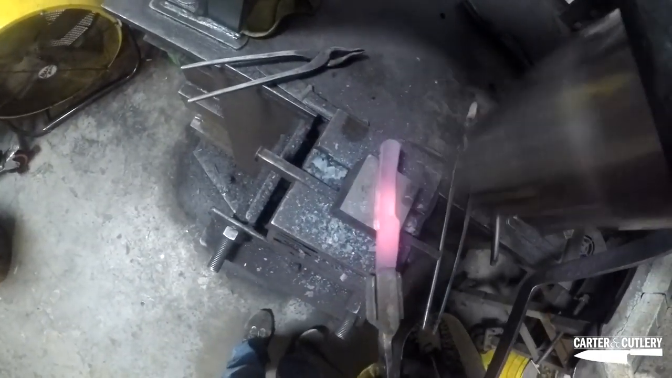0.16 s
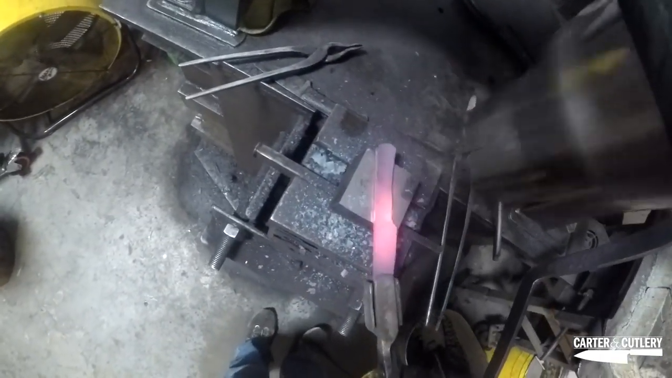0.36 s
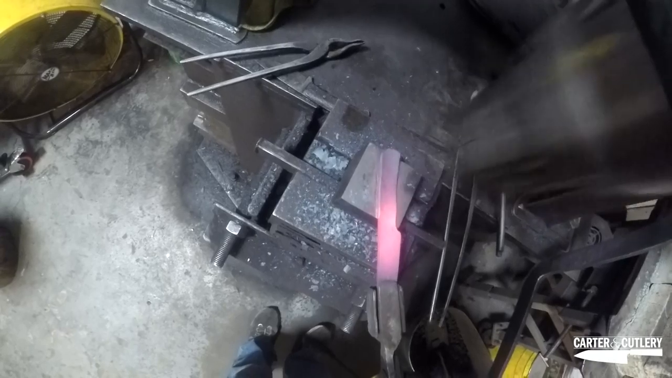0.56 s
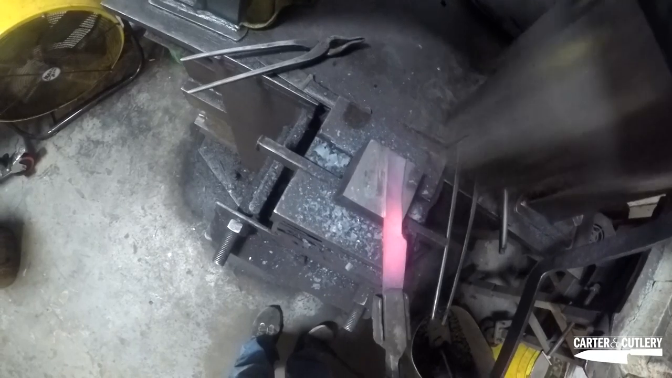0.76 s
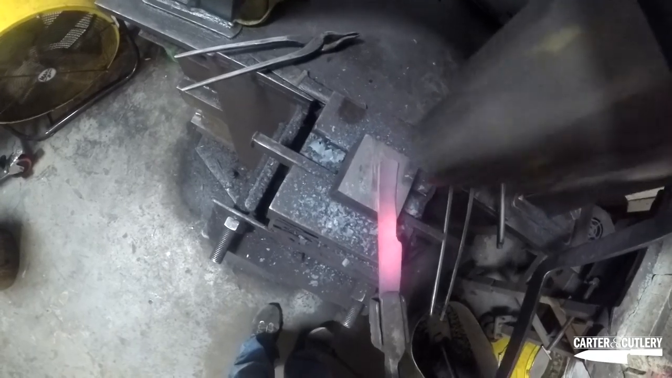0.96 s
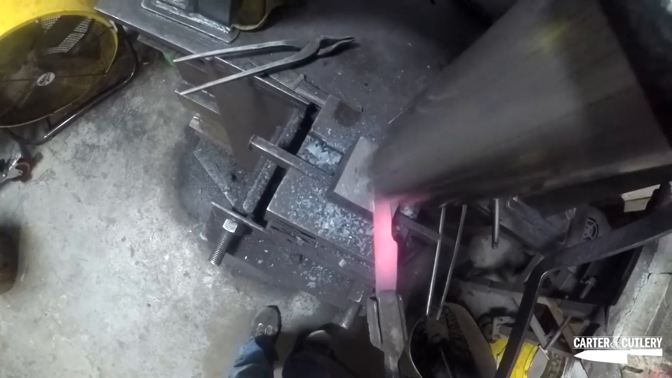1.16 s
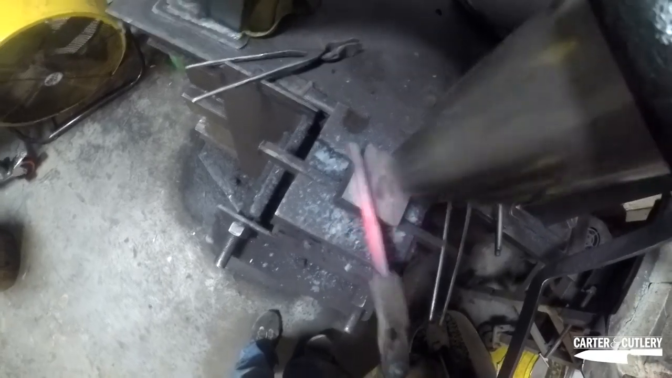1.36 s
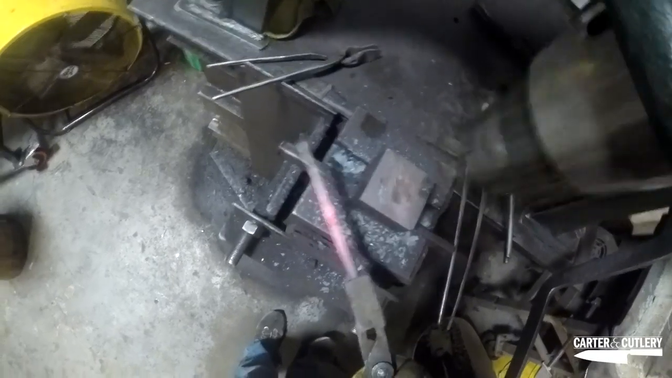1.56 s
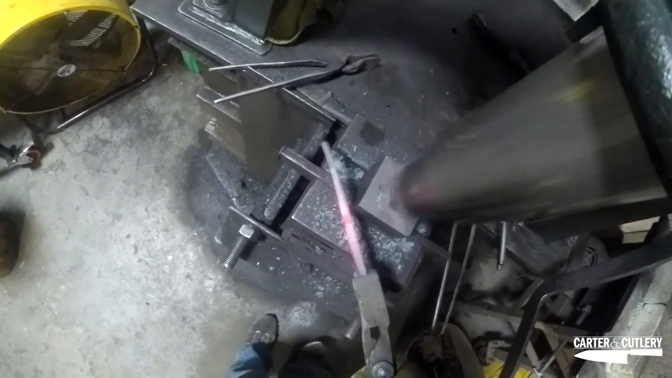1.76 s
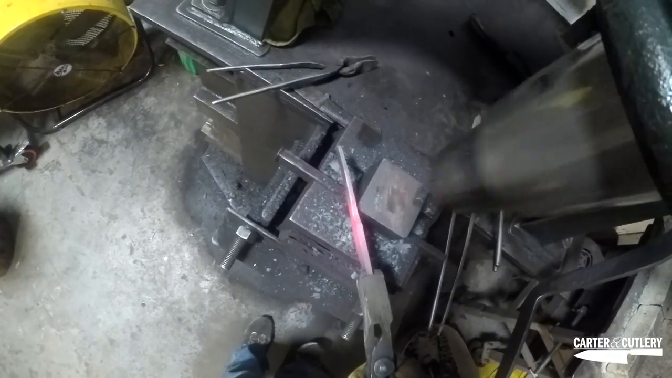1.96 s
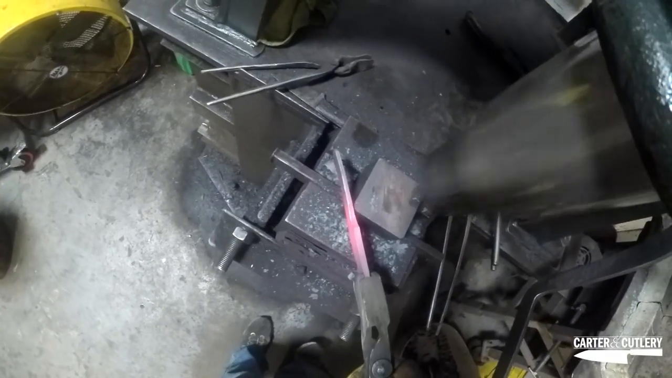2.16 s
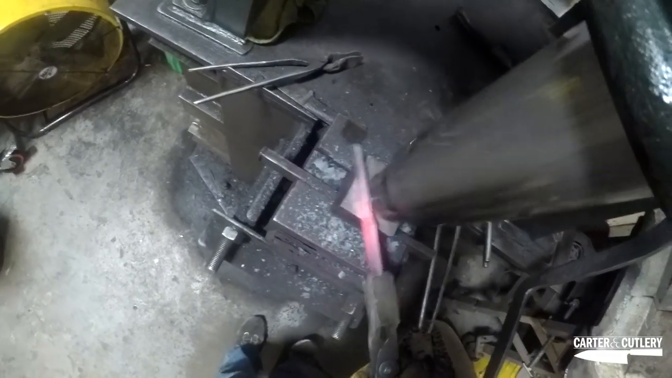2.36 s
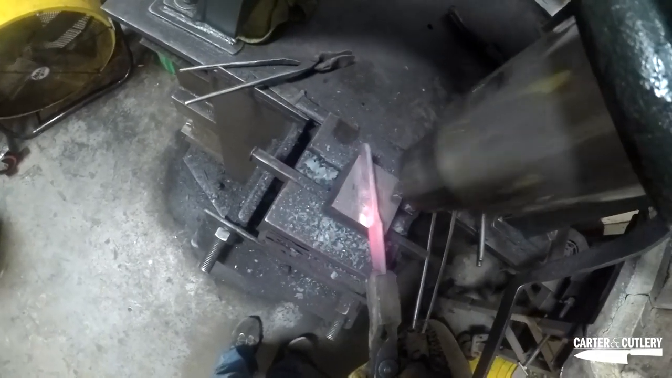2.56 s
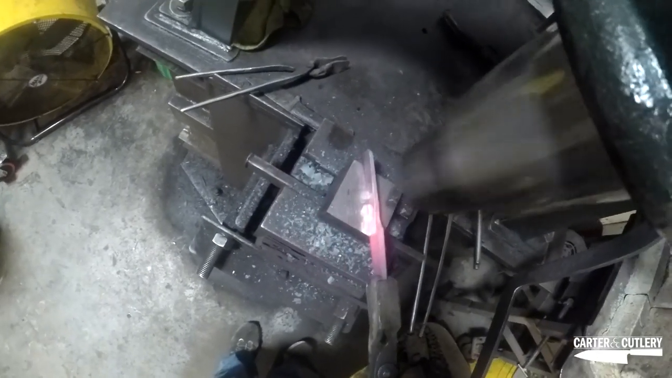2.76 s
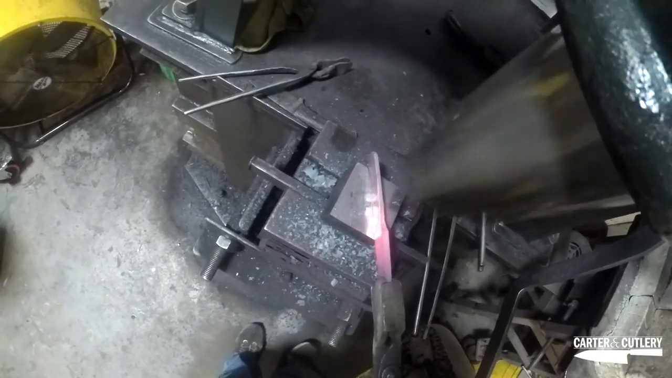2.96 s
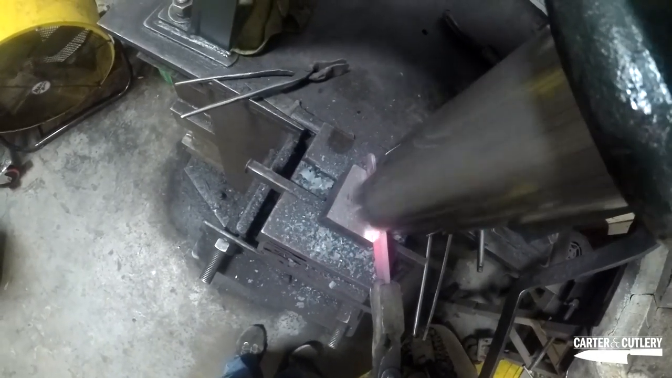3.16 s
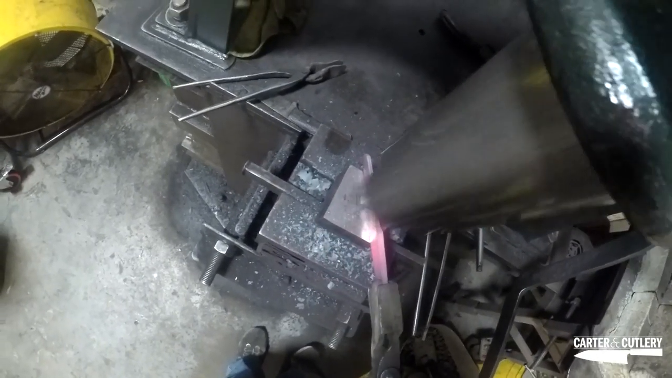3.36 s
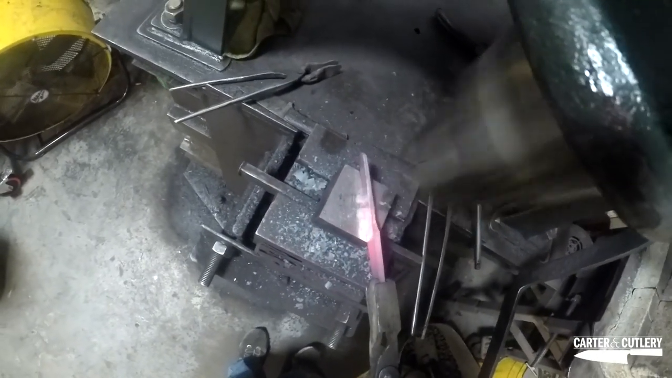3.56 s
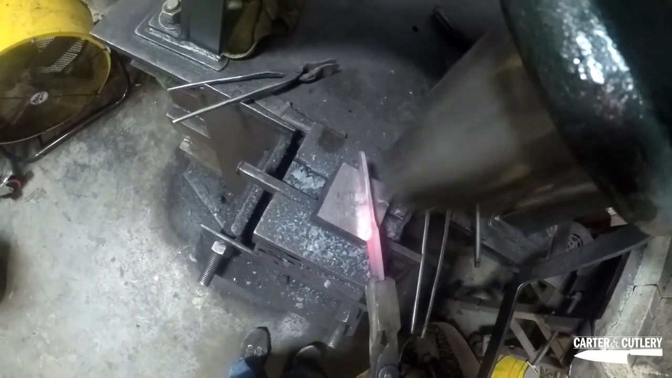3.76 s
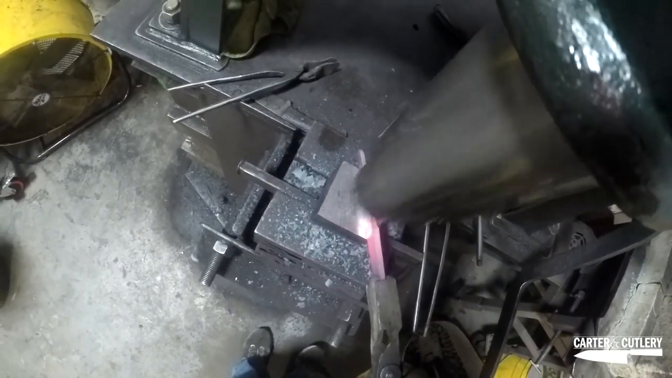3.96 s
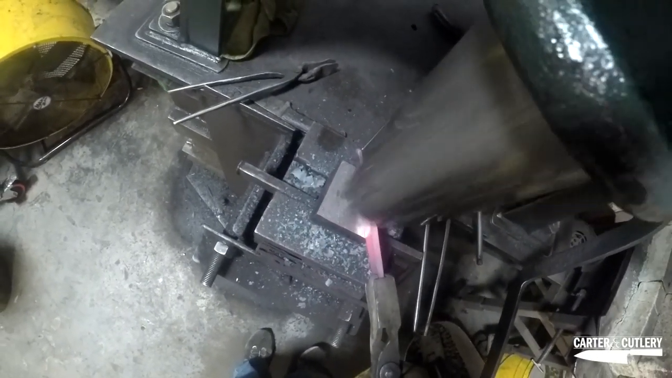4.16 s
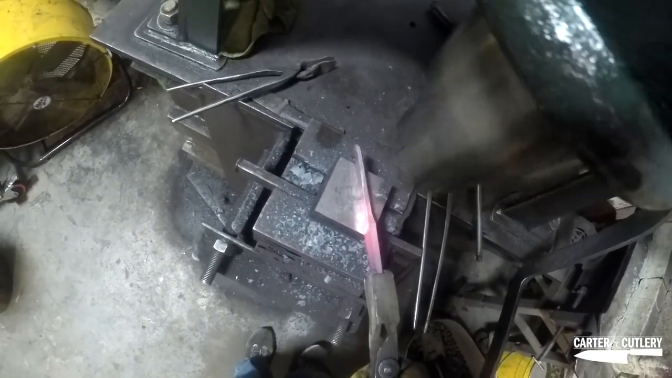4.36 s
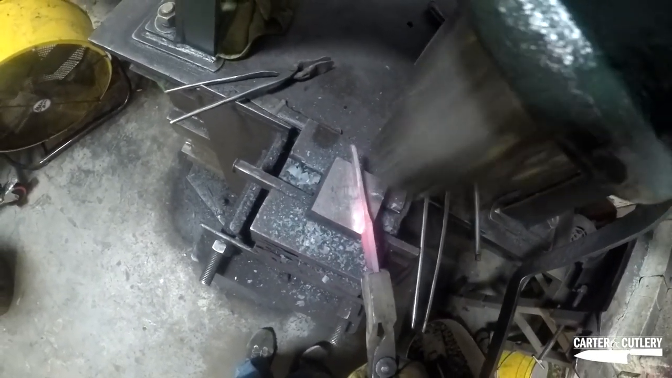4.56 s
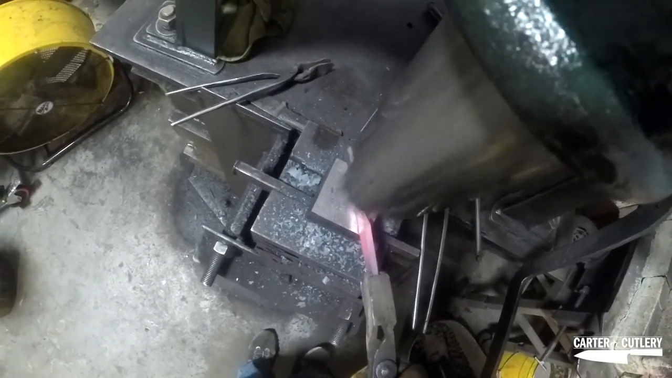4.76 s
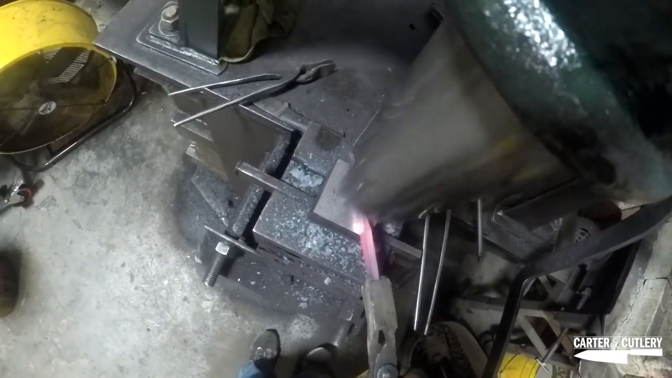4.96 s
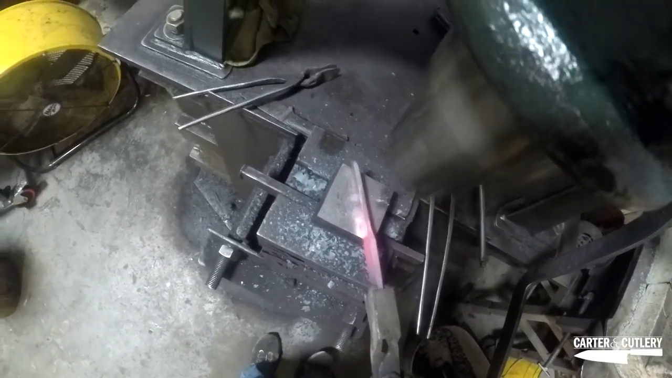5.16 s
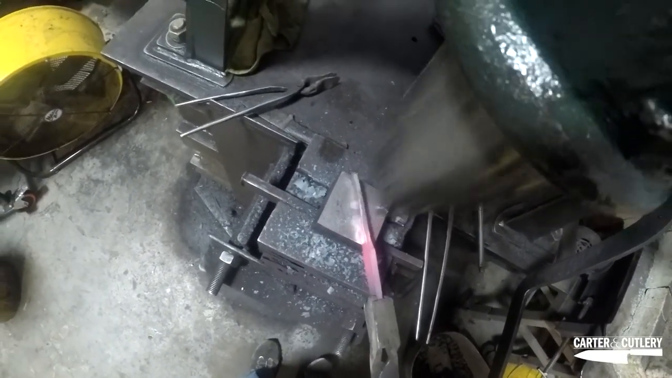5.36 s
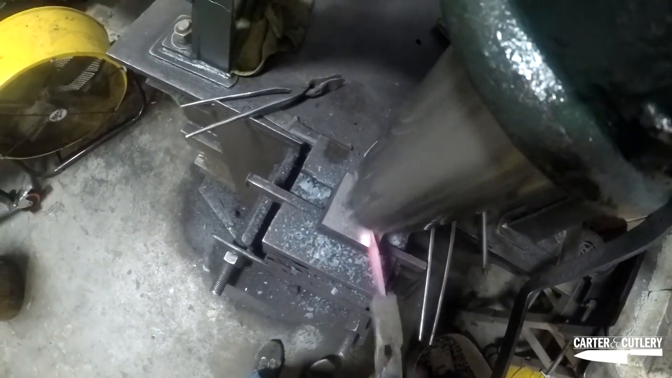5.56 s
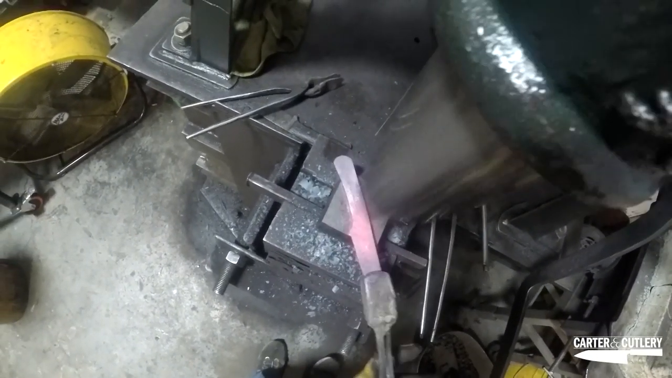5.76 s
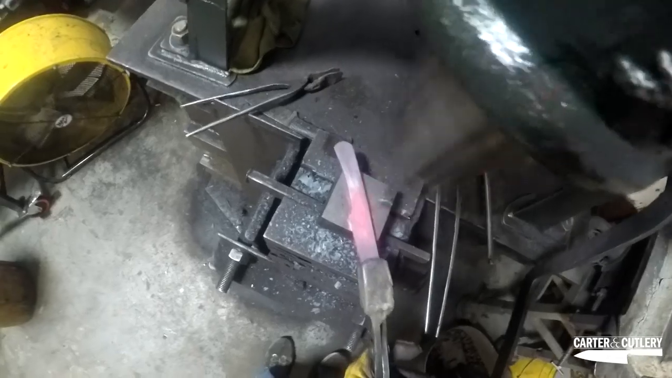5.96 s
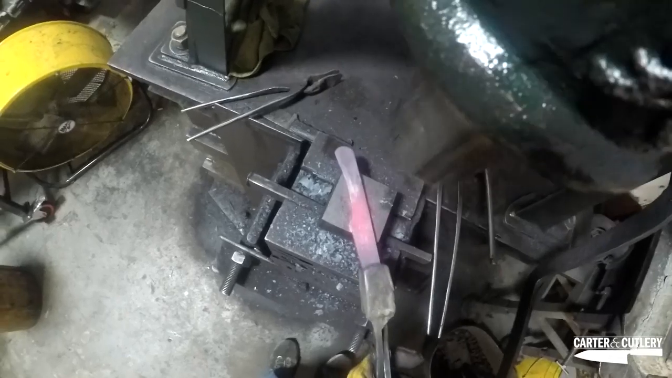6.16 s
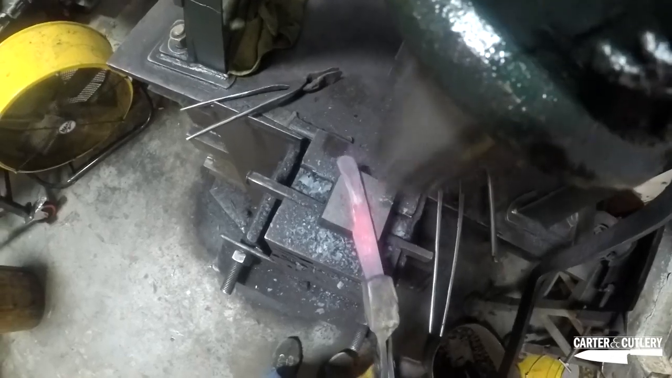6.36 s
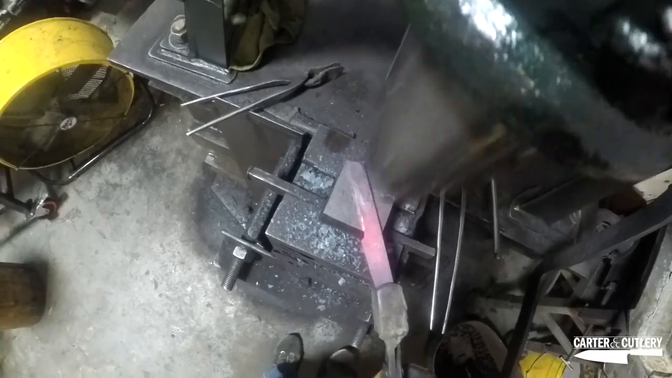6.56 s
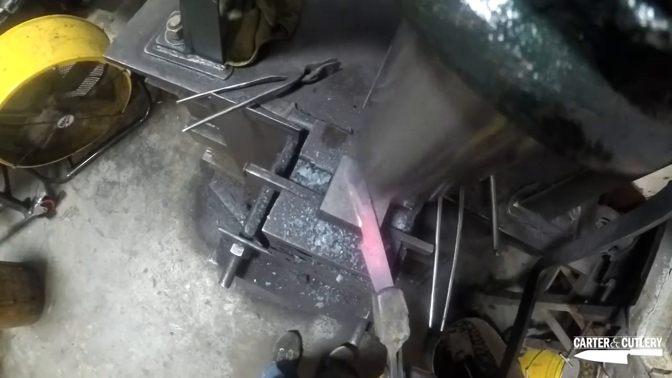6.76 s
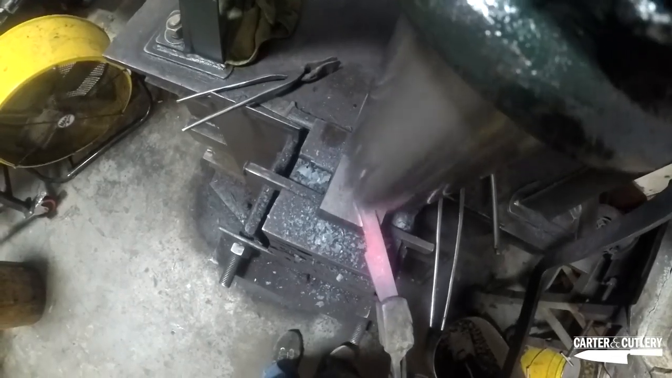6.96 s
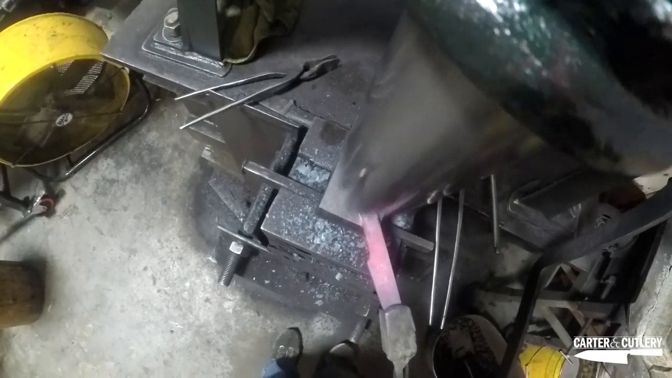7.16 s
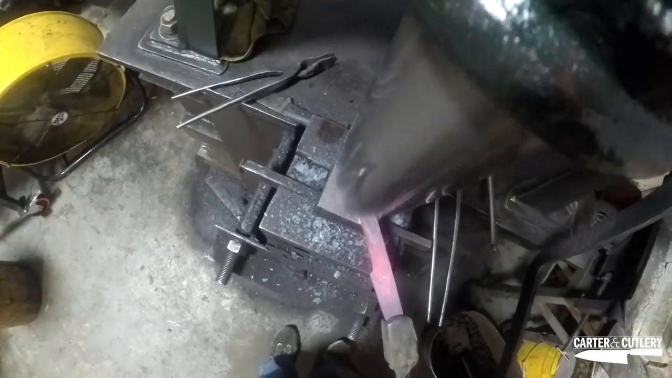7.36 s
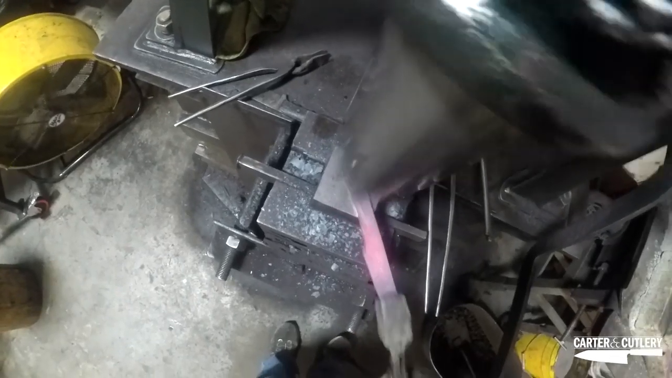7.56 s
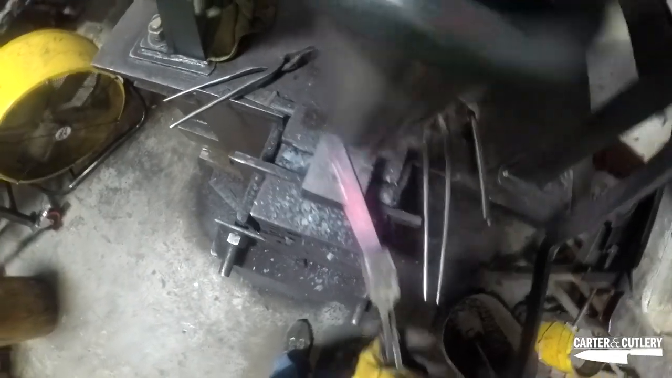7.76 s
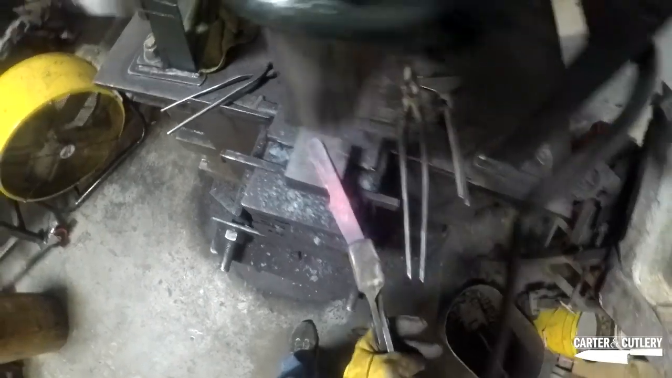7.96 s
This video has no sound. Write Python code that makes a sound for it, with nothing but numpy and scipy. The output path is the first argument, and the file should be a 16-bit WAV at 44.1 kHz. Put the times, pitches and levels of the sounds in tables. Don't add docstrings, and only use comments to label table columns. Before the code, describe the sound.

A motor hums and labours while a heavy hammer slams steel on an anvil die, very loud and close. Sharp metallic cracks come in three runs, with short scuffs before blows and thuds through the floor. Between the first two, thin tongs squeal, metal taps and drags, and scale ticks. Spring knocks fill the slower second run; the third is quick and ringing, then tongs jingle in the echoing workshop.

```python
import sys
import numpy as np
from scipy import signal
from scipy.fft import rfft, irfft, next_fast_len
from scipy.io import wavfile
from scipy.ndimage import uniform_filter1d

SR = 44100
rng = np.random.default_rng(int(sys.argv[2]) if len(sys.argv) > 2 else 0)


def nominal_scale(level):
    x = np.asarray(level, float) / 20
    return 10 ** x


def transcribe(u):
    v = np.clip(np.atleast_2d(u).T, -1, 1)
    q = np.round(v * 32767).astype(np.int16)
    wavfile.write(sys.argv[1], SR, q)


N = 357057

# (time [s], crack level [dB], treble re crack [dB], thud level [dB],
# die ring re crack [dB])
RUN_1 = [
    (0.0762, 5.5, -15, -23, -30),
    (0.2962, 4.5, -13.5, -23, -34),
    (0.5143, 7, -13, -24, -46),
    (0.7328, 7, -15.5, -24, -19),
    (0.9512, 5.5, -14.5, -25, -40),
    (1.202, 2.5, -13, -27.5, -43),
]
RUN_2 = [(2.9369, -8.5, -14, -27, -42), (3.2088, 3.5, -19, -23.5, -14), (3.457, 7, -22.5, -23, -16),
         (3.7157, 4, -18, -21.5, -36), (3.9794, 5, -15.5, -22, -26), (4.2455, 4, -15.5, -21, -26),
         (4.5148, 6.5, -19, -22, -40), (4.7826, 5, -15, -21.5, -13), (5.0522, -2, -17, -23.5, -20),
         (5.3231, -1.5, -23.5, -23, -34), (5.6, 3, -24, -23, -11)]
RUN_3 = [
    (6.1229, 0, -4.5, -22, -14),
    (6.33, 5, -13.5, -21.5, -13),
    (6.5463, 8.5, -17.5, -21, -43),
    (6.776, 6, -15, -25, -11),
    (7.001, 1.5, -17, -28, -5),
    (7.2197, 5, -17, -26, -9.5),
    (7.4416, 6, -19.5, -26, -7),
    (7.665, 2, -10.5, -28, -3.5),
]
BLOW_S, CRACK_DB, TREBLE_DB, THUD_DB, DIE_RING_DB = np.transpose(RUN_1 + RUN_2 + RUN_3)
# (frequency [Hz], level [dB per Hz])
CRACK_COLOUR = [(470, -17.5), (800, -10.5), (986, -16), (1330, 0), (1720, -2.5), (2070, -5), (2310, -15.5),
                (2710, 2.5), (3340, -2), (5080, -9.5), (5740, -16), (9760, -14), (12000, -24.5),
                (15300, -25)]
# (frequency [Hz], level [dB per Hz])
CLATTER_COLOUR = [(410, -6), (700, -7.5), (1110, -4), (1280, 3.5), (1560, 0), (1840, -2), (2570, -4),
                  (3330, -3), (3590, -2.5), (4530, -11.5), (6500, -21), (9200, -22), (11500, -33.5),
                  (15300, -43)]
# (time [s], level [dB])
SPRING_KNOCKS = [(3.581, -33), (3.846, -41), (4.106, -36), (4.371, -35.5), (4.483, -44), (4.639, -34),
                 (4.745, -44), (4.904, -34), (5.148, -35), (5.176, -30.5), (5.446, -32.5)]


def evened(x):
    return x / np.sqrt(np.mean(x ** 2) + 1e-20)


def read(points, hz):
    f, value = np.transpose(points)
    return np.interp(np.log(hz + 1), np.log(f + 1), value)


def train(s, gain, count=N):
    out = np.full(count, 1e-30)
    out[np.round(np.asarray(s) * SR).astype(int)] = gain
    return out


def add(mix, s, sound):
    part = mix[round(s * SR):][:len(sound)]
    part += sound[:len(part)]


def per_run(values):
    return np.repeat(values, [len(RUN_1), len(RUN_2), len(RUN_3)])


def noise(shape, count=N):
    size = next_fast_len(count, True)
    gain = nominal_scale(read(shape, np.fft.rfftfreq(size, 1 / SR)))
    z = rfft(rng.standard_normal(size)) * gain
    return evened(irfft(z, size)[:count])


def dying(shape, t60s, s, db, treble_db, rise, count=N):
    size = next_fast_len(count, True)
    z = rfft(noise(shape, count), size)
    out = np.zeros(count)
    octave = np.log2(np.fft.rfftfreq(size, 1 / SR) / 62.5 + 1e-9)
    lowest = int(np.log2(shape[0][0] / 62.5))
    highest = int(np.log2(shape[-1][0] / 62.5)) + 1
    grow = np.exp(-1 / (rise * SR))
    for k in range(lowest, highest + 1):
        window = (1 + np.cos(np.pi * np.clip(octave - k, -1, 1))) / 2
        band = irfft(z * window, size)[:count]
        tilt = np.clip(k / 2 - 2.5, 0, 2)
        power = train(s, nominal_scale(db + treble_db * tilt) ** 2, count)
        fall = nominal_scale(-2 * 60 / read(t60s, 62.5 * 2. ** k) / SR)
        power = signal.lfilter([1 - grow], np.convolve([1, -fall], [1, -grow]), power)
        out += band * np.sqrt(abs(power))
    return out


def ring(push, hz, t60):
    r, w = nominal_scale(-60 / t60 / SR), 2 * np.pi * hz / SR
    return signal.lfilter([np.sin(w)], [1, -2 * r * np.cos(w), r * r], push + 1e-30)


def rings(push, modes):
    return sum(nominal_scale(db) * ring(push, hz, t60) for hz, db, t60 in modes)


def body(modes, t):
    out = np.zeros(len(t))
    for hz, level_db, t60, delay, rise in modes:
        u = np.maximum(t - delay, 0)
        swell = (1 - np.exp(-u / rise)) ** 2
        out += nominal_scale(level_db - 60 * u / t60) * swell * np.sin(2 * np.pi * hz * u)
    return out


def seat(column):
    # (time [s], floor slab re thud [dB], bar pitch [Hz])
    seats = np.transpose([(0.08, 2, 3660), (0.5, 8, 3930), (1.2, 3.5, 4390), (3.45, 3.5, 3810),
                          (3.72, 3, 3300), (3.98, 4.5, 3030), (4.4, 2.5, 3810), (4.78, 5, 3500),
                          (5.32, 6, 3670), (6.12, 6.5, 3760), (6.33, 7.5, 3780), (6.78, 8.5, 3220),
                          (7.22, 8.5, 3710), (7.66, 5.5, 3300)])
    return np.interp(BLOW_S, seats[0], seats[column])


def motor():
    # (time [s], motor load [dB], floor rumble [dB])
    load_table = [(0.0, 9.5, -38), (0.9, 5.5, -48), (1.3, 1.5, -37), (1.432, 1, -32.5), (1.599, 4, -34.5),
                  (1.87, 3, -44), (2.88, 1.5, -43), (3.3, 4.5, -34.5), (4.6, 7, -50), (5.14, 4, -40.5),
                  (5.6, 4, -39.5), (5.99, 3, -31.5), (6.5, 10, -41), (7.4, 2.5, -47.5), (7.8, 3.5, -63),
                  (8.09, -1, -31.5)]
    # (frequency [Hz], level [dB per Hz])
    wash_colour = [(150, -37.5), (250, -1.5), (542, -7.5), (689, -8.5), (877, -9), (1390, -3.5), (2110, -6),
                   (3240, -1.5), (4190, -4.5), (4900, -16), (5810, -17), (10500, -25), (12500, -38.5),
                   (15300, -43)]
    # (frequency [Hz], width [Hz], level [dB])
    fuzzy_tones = [(122.4, 19, -71), (194, 14, -68), (1410, 32, -71.5), (5330, 63, -77), (6150, 90, -85),
                   (7300, 90, -83.5)]
    # (frequency [Hz], level [dB per Hz])
    hum_colour = [(50, -25), (80, 5.5), (130, -4.5), (200, -3), (300, -46), (500, -67.5)]
    rumble_colour = [(12, -26.0), (24, -21.0), (32, -21), (45, -29.5), (70, -57.0), (200, -79.0)]
    s, *levels = np.transpose(load_table)
    load_db, rumble_db = (np.interp(np.arange(N) / SR, s, db) for db in levels)
    u = np.arange(SR // 2) / SR / 0.049
    heave_db = 6.5 * signal.oaconvolve(train(BLOW_S, 0.83), u ** 2 * np.exp(2 - 2 * u))[:N]
    flicker = evened(uniform_filter1d(uniform_filter1d(rng.standard_normal(N), 700), 700))
    wash = nominal_scale(-6.5 + 2.1 * flicker) * noise(wash_colour)
    for hz, width, db in fuzzy_tones:
        wash += nominal_scale(db + 54) * evened(ring(rng.standard_normal(N), hz, 2.2 / width))
    wash *= nominal_scale(-47 + load_db + 0.26 * heave_db)
    hum = nominal_scale(-60.5 + 1.32 * load_db + 3.2 * heave_db) * noise(hum_colour)
    rumble = nominal_scale(rumble_db + 0.73 * heave_db) * noise(rumble_colour)
    return wash + hum + rumble


def ram():
    # (frequency [Hz], level [dB], t60 [s])
    steady = [
        [(1290, 0, .3), (1360, -3, .22), (1412, 0, .35), (1442, -6, .22)],
        [(3400, -1, .7), (3432, -7, .3), (3345, -6, .2), (3270, -6, .2)],
    ]
    # (frequency [Hz], level [dB], t60 [s])
    parts = [
        [(2766, -3, 0.099), (2810, -1, 0.059), (2850, 2.5, 0.06), (2920, -8, 0.058)],
        [(1320, 1, 0.041), (1383, -5, 0.074)],
        [(2020, 2, 0.02), (2052, -3.5, .03)],
        [(3295, 1, 0.047), (3420, -9.5, 0.094)],
        [(3240, -6.5, 0.77), (3200, -1.5, 0.243), (3320, 4, 0.304), (3280, -3, 0.65), (3499, -17.5, .25)],
        [(5000, -14, 0.038), (4910, 5.5, 0.08), (4935, -14.5, 0.22)],
        [(2900, -4.5, .25), (3785, -12.5, .2), (4885, -21, .2), (5400, -22, 0.41), (1880, -13.5, .25)],
    ]
    # (anvil face, guide, ram face, ram body, key, re crack [dB])
    woken_db = np.transpose([(-5, -5, -9, -27, -27), (-15, -9.5, -16, -33, -38),
                (-11.5, -14, -51, -34, -41), (-14.5, -7, -32.5, -47, -45), (-12, -6.5, -37, -47, -51),
                (-5, -5, -30, -50, -52), (-13, -23, -32, -49, -45), (-19, -33, -7, -43, -47),
                (-18, -28, -10, -49, -45), (-28, -15, -3.5, -27.5, -15), (-31, -11.5, -3.5, -26.5, -24.5),
                (-15, -32, -9.5, -27, -17.5), (-9.5, -42, -14, -33, -22), (-17, -14, -24, -50, -42),
                (-10, -33, -9, -52, -48), (-16, -28, -25, -57, -50), (-17, -22, -14, -57, -55),
                (-8, -43, -12, -48, -42), (-8, -23, -8.5, -31, -39), (-11, -16.5, -13.5, -34, -24.5),
                (-9, -21, -10.5, -42, -20), (-7, -7, -6, -44, -18), (-10, -7, -30, -48, -19),
                (-25, -12, -9, -44, -34), (-14, -13, -7, -39, -46)])
    anvil_db = (-25, -30, -25.5)
    upright_db = (-30, -44, -40)
    column_db = (-23, -43.5, -45.5)
    levels = [per_run(anvil_db), per_run(upright_db), DIE_RING_DB, *woken_db, per_run(column_db)]
    out = np.zeros(N)
    for db, modes in zip(levels, steady + parts):
        for hz, level_db, t60 in modes:
            start = BLOW_S + rng.uniform(.0005, 0.003, len(BLOW_S))
            out += ring(train(start, nominal_scale(CRACK_DB + db + level_db - 7.0)), hz, t60)
    out += rings(train([0], nominal_scale(-46)), steady[0] + steady[1])
    flutter = evened(uniform_filter1d(rng.standard_normal(N), size=250))
    return out * nominal_scale(1.6 * flutter)


def take_up():
    s = np.array([0.068, 0.287, 0.5048, 0.724, 0.942, 1.185, 3.433, 3.7037, 3.972, 4.234, 4.509, 4.7724,
                  5.041, 5.309, 6.106, 6.3096, 6.535, 6.7685, 6.989, 7.2089, 7.4337, 7.653])
    # (frequency [Hz], level [dB per Hz])
    scuff_colour = [(500, -8), (1000, -4), (1400, 7), (2800, -2), (4300, -11.5), (5200, -26), (13000, -33),
                    (15300, -38), (15800, -79.5)]
    blow = np.searchsorted(BLOW_S, s)
    stroke_s = np.diff(BLOW_S, prepend=-.15)[blow] % .3
    db = -19 - 230 * np.maximum(stroke_s - 0.22, 0)
    db -= 5.5 * np.minimum(CRACK_DB[blow], 0)
    top_s, top_db = np.transpose(SPRING_KNOCKS)
    all_db = np.r_[db - 5.5, top_db + 1.5]
    return dying(scuff_colour, [(1000, 0.022), (10000, 0.03)], np.r_[s, top_s], all_db, 0, rise=0.00044)


def crack():
    # (frequency [Hz], t60 [s])
    crack_t60 = [(700, 0.085), (1400, 0.043), (2800, 0.069), (5600, 0.053), (9000, 0.023), (14000, 0.023)]
    # (frequency [Hz], level [dB], t60 [s])
    die_modes = [(1530, -53, 0.174), (2120, -28, 0.0064), (2563, 0, 0.033), (3320, -4.5, 0.056),
                 (3780, -6.5, 0.089), (4570, -8, 0.079), (5290, -13.5, 0.048)]
    # (frequency [Hz], level [dB], t60 [s])
    edge_modes = [(7240, -17, 0.03), (8880, -21, 0.033), (10900, -9.5, 0.01), (11900, -9, 0.012)]
    # (time [s], level [dB], pitch of the bar's free end [Hz],
    # die edge re blow [dB], free end re blow [dB])
    _, land_db, free_hz, edge_db, free_db = np.transpose([(0.0762, 1, 3800, -27, 2),
                                             (0.2957, -5, 3930, -30, 21), (0.5137, -17.5, 4130, -17, -1),
                                             (0.7327, -1.5, 3950, -18.5, 19), (0.9507, -1, 4000, -26, 6),
                                             (1.2017, -0.5, 4520, -36, 20), (2.9362, -12, 3940, -26, 13),
                                             (3.2091, -2, 3670, -44, 10), (3.4565, 2.5, 3950, -23.5, 11.5),
                                             (3.7155, -1, 4450, -37, 13), (3.9804, -1, 3910, -32, 12.5),
                                             (4.2443, 1.5, 3670, -32, 13), (4.5151, 6.5, 3690, -36.5, 8),
                                             (4.7825, -0.5, 3960, -36, 9.5), (5.0529, -18, 3750, -33, 5),
                                             (5.3243, -11, 3700, -37, 9), (5.5997, 0, 3720, -24, 7.5),
                                             (6.1225, -3.5, 3850, -20.5, 5), (6.33, 5, 3700, -26, 11.5),
                                             (6.5475, 8, 3700, -23.5, 12), (6.776, 7.5, 3570, -28, 9.5),
                                             (7.001, -7, 4500, -20, 10.5), (7.219, -1, 3790, -34, 15.5),
                                             (7.4425, 0, 4530, -26, 6), (7.6655, -6, 3700, -31, 10)])
    burst = nominal_scale(-13.5) * dying(CRACK_COLOUR, crack_t60, BLOW_S, CRACK_DB, TREBLE_DB + 18.0, rise=0.0001)
    impact = np.exp(-np.arange(500) / SR / 0.00053)
    shaken = signal.oaconvolve(train(BLOW_S, nominal_scale(CRACK_DB)), impact / np.linalg.norm(impact))[:N]
    dies = sum(nominal_scale(db) * ring(shaken * rng.standard_normal(N), hz, t60) for hz, db, t60 in die_modes)
    edge = train(BLOW_S, nominal_scale(land_db + 2.44 * (edge_db - np.median(edge_db)) - 0.5))
    edge = signal.oaconvolve(edge, impact ** 0.44 / 6)[:N] * rng.standard_normal(N)
    dies += rings(edge, edge_modes)
    t = np.arange(3000) / SR
    bar_hz = seat(2)
    for k, s in enumerate(BLOW_S):
        fade = nominal_scale(CRACK_DB[k] - 2.5 - 60 * t / 0.036) * (1 - np.exp(-t / 0.00067))
        add(dies, s, fade * np.sin(2 * np.pi * bar_hz[k] * t))
        fade = nominal_scale(land_db[k] + free_db[k] - 60 * t / 0.023) * (1 - np.exp(-t / 0.00038))
        add(dies, s, fade * np.sin(2 * np.pi * free_hz[k] * t))
    return burst + nominal_scale(-19.0) * dies


def thud():
    # (frequency [Hz], level [dB], t60 [s], delay [s], rise [s])
    slab_modes = [(34.37, -2.5, 0.54, 0.00023, 0.016), (57.3, -0.5, 0.12, 0.0057, 0.0053),
                  (99, -7.5, 0.13, 0.02075, 0.0014), (138.2, -9, 0.24, 0.0309, 0.008)]
    # (frequency [Hz], level [dB], t60 [s], delay [s], rise [s])
    frame_modes = [(204.8, 0, 0.11, 0.0031, 0.0021), (178, 5, 0.049, 0.052, 0.0035),
                   (243, -2.5, 0.039, 0.00027, 0.0034), (282.6, -10.5, 0.13, 0.0041, 0.0032),
                   (332, 2.5, 0.043, 0.0044, 0.0016), (332, -17, 0.37, 0.027, 0.00063),
                   (411.6, 2, 0.06, 0.00067, 0.0023), (417.6, -18, 0.54, 0.0087, 0.024),
                   (520.4, -9.5, 0.13, 0.02, 0.00048), (606, -11, 0.11, 0.032, 0.0018),
                   (754, -11.5, 0.27, 0.011, 0.014), (843, -11.5, 0.23, 0.015, 0.0028),
                   (922, -4.5, 0.037, 0.00037, 0.00056), (1020, -20, 0.17, 0.0056, 0.0056)]
    # (frequency [Hz], level [dB per Hz])
    boom_colour = [(35, -37), (60, -13.5), (119, 2), (188, -6), (232, -6.5), (363, -8.5), (399, -5.5),
                   (555, -11), (1000, -14), (1300, -45), (2200, -120)]
    # (frequency [Hz], t60 [s])
    boom_t60 = [(60, 0.38), (125, 0.74), (250, 0.49), (500, 0.51), (1000, 0.34)]
    # (time [s], level [dB])
    bumps = [
        (1.557, -47.5),
        (1.926, -50),
        (5.901, -46.5),
        (5.969, -46),
    ]
    guards_db = (1.5, -4.5, -1.5)
    t = np.arange(SR // 2) / SR
    frame = nominal_scale(-13) * dying(boom_colour, boom_t60, [0], 0, 0, rise=.008, count=len(t))
    frame += body(frame_modes[:9], t)
    struck = signal.oaconvolve(train(BLOW_S, nominal_scale(THUD_DB + 5.5)), frame)
    struck += signal.oaconvolve(train(BLOW_S, nominal_scale(THUD_DB + seat(1))), body(slab_modes, t))
    guards = train(BLOW_S, nominal_scale(THUD_DB + 5.5 + per_run(guards_db)))
    struck += signal.oaconvolve(guards, body(frame_modes[9:], t))
    bump_s, bump_db = np.transpose(bumps)
    loose_db = np.r_[THUD_DB - 15, bump_db - 5]
    loose = dying(boom_colour, boom_t60, np.r_[BLOW_S, bump_s], loose_db, 0, rise=0.0039)
    block = nominal_scale(19.5) * body(slab_modes[2:], t)
    return struck[:N] + loose + signal.oaconvolve(train(bump_s, nominal_scale(bump_db)), block)[:N]


def clatter():
    # (frequency [Hz], t60 [s])
    clatter_t60 = [(700, 0.37), (1400, 0.63), (2800, 0.36), (5600, 0.7), (9000, 0.19), (14000, 0.45)]
    tail_db = (0.4, 0.24, -1.4)
    db = -29 + 0.83 * CRACK_DB + per_run(tail_db)
    return dying(CLATTER_COLOUR, clatter_t60, BLOW_S, db, 0.66 * (TREBLE_DB + 19.5), rise=0.0024)


def contacts():
    # (time [s], level [dB], pitch [Hz])
    rebounds = [(0.9857, 0.5, 2640), (1.2217, -8, 1320), (3.7492, 0, 1590), (4.2813, 0.5, 1300),
                (4.5498, -6, 1320), (4.819, -3.5, 1340), (5.0588, -1.5, 1370), (5.3376, 2.5, 2800),
                (5.6164, 3, 1410), (7.255, -1, 2800)]
    # (time [s], level [dB], pitch [Hz])
    grazes = [
        (1.199, -3, 2860),
        (2.9343, -17, 3500),
        (4.514, -7, 1270),
        (5.052, -9, 2850),
        (6.1226, 2, 3300),
        (6.5477, 7, 3130),
        (6.9989, -15, 2650),
    ]
    # (time [s], level [dB], pitch [Hz])
    rattles = [(3.0075, -14, 2740), (3.2879, -15, 2870), (3.3154, -12.5, 1400), (5.4146, -20, 2830),
               (6.1917, -7.5, 2900), (6.2292, -4, 2680), (6.284, -25, 2500), (6.455, -5.5, 2770),
               (7.487, -10, 1410)]
    rows = list([(1.5603, -2, 3700, -15.5, -15), (1.594, -18, 1400, -47, -5), (1.7282, -24, 2700, -17, -3),
                 (1.8557, -18, 3420, -24.5, -30), (1.923, -4, 1360, -17.5, -17),
                 (2.107, -16, 1770, -24, -13), (2.4103, -27, 4930, -14, -10), (2.476, -14, 2650, -23, -13),
                 (2.411, -35, 8200, -13, -11.5), (2.828, -31, 1390, -26.5, -4.5),
                 (2.8848, -32, 1330, -21, -1), (2.893, -32, 1340, -23, -2), (3.045, -28, 1400, -24, -2),
                 (5.8914, -13, 2670, -0.5, -4), (5.904, -15.5, 2980, -4, -5),
                 (5.9554, -12.5, 2800, -15.5, -5.5), (5.985, -10.5, 1310, -43, -13),
                 (5.9989, -10, 1450, -27, -20), (6.084, -30, 1360, -15, -3), (7.9294, -29, 3900, 0.5, -5),
                 (7.9847, -17.5, 2620, -15, -23), (8.022, -23.5, 1470, -18, -11)])
    for table, treble_db in (rebounds + grazes, -22), (rattles, -22.5):
        for s, db, hz in table:
            rows.append((s, db, hz, treble_db, -15.5 - .45 * db))
    return np.transpose(rows)


def ticks():
    s, db, hz, treble_db, knock_db = contacts()
    click_t60 = [(1000, 0.051), (10000, 0.012)]
    out = nominal_scale(-15.5) * dying(CRACK_COLOUR, click_t60, s, db, treble_db + 15, rise=0.00006)
    out += dying(CLATTER_COLOUR, [(1000, 0.22), (10000, 0.28)], s, db - 33.0, 0, rise=0.0024)
    t = np.arange(4000) / SR
    spread = rng.uniform(-0.084, 0.073, (len(s), 4))
    for k in range(len(s)):
        off = spread[k, :, None]
        cluster = np.sin(2 * np.pi * (hz[k] * (1 + off) * t + 40 * off)).sum(0) / 2
        fade = nominal_scale(db[k] + knock_db[k] - 3 - 60 * t / 0.028) * (1 - np.exp(-t / 0.0008))
        add(out, s[k], cluster * fade)
    return out


def chattering(spells, modes):
    out, t = np.zeros(N), np.arange(SR // 3) / SR
    for s, length, db in spells:
        touches = nominal_scale(db) * (t < length) * (rng.random(len(t)) < 2500 / SR)
        sound = sum(nominal_scale(level_db) * ring(touches * rng.standard_normal(len(t)), hz, t60)
                    for hz, level_db, t60 in modes)
        add(out, s, sound * nominal_scale(-900 * np.maximum(t - length, 0)))
    return out


def wide_tongs():
    # (time [s], length [s], level [dB])
    spells = [
        (1.326, 0.051, -69),
        (1.378, .05, -75),
    ]
    # (frequency [Hz], level [dB], t60 [s])
    modes = [(3994, 0, .1), (6200, 3, .12), (6772, 0, .08), (8312, -3, .1), (10029, -8, .08)]
    return chattering(spells, modes)


def squeal():
    # (frequency [Hz], level [dB], loudest time [s])
    squeal_tones = [(2740, 10, 1.339), (3994, 10, 1.357), (6070, -6, 1.33), (6240, 1, 1.336),
                    (6772, 1, 1.358), (7181, -2, 1.345), (8312, 1, 1.336), (8600, -8, 1.35), (9448, 0, 1.345),
                    (9790, -8, 1.36), (10029, -2, 1.333), (10191, -2, 1.35), (11353, -10, 1.35),
                    (12344, -5, 1.346),
                    (2519, 0, 1.365), (4412, -3, 1.34), (11020, -12, 1.34), (13345, -12, 1.365),
                  (13970, -12, 1.333), (15200, -14, 1.329)]
    start_s, end_s = 1.326, 1.373
    t, out = start_s + np.arange(SR // 8) / SR, np.zeros(N)
    stop_db = -1900 * np.maximum(t - end_s, 0)
    gate = np.minimum((t - start_s) / .002, 1) * nominal_scale(-46 + stop_db)
    for hz, db, top_s in squeal_tones:
        waver_db = 3.5 * evened(uniform_filter1d(rng.standard_normal(len(t)), size=200))
        swell = nominal_scale(db + waver_db - 480 * abs(t - top_s))
        add(out, start_s, gate * swell * np.sin(2 * np.pi * (hz * t + rng.random())))
    return out


def rub():
    # (time [s], length [s], level [dB])
    spells = [
        (1.78, 0.24, -66.5),
    ]
    # (frequency [Hz], level [dB], t60 [s])
    modes = [(3300, -1, 0.027), (3500, 6.5, 0.057), (3670, -3, .03)]
    return chattering(spells, modes)


def scale():
    snap_s = [3.337, 3.700, 3.877, 3.935, 4.141, 4.408, 5.028, 5.216, 5.49, 5.57, 5.852, 5.866]
    faint_s = [1.835, 2.037, 2.225, 2.378, 2.385, 2.587, 2.652, 6.405, 6.51, 6.74, 7.49]
    prick = nominal_scale(-60 * np.arange(800) / SR / .02)
    snaps = train(snap_s, nominal_scale(-47.5)) + train(faint_s, nominal_scale(-53))
    hiss = evened(np.diff(rng.standard_normal(N + 2), 2))
    return signal.oaconvolve(snaps, prick)[:N] * hiss


def spring():
    rise_s = 0.0054
    out, u = np.zeros(N), np.arange(2000) / SR / rise_s
    offsets = rng.uniform(-0.052, 0.039, (len(SPRING_KNOCKS), 3))
    for (s, db), off in zip(SPRING_KNOCKS, offsets):
        hz = 1326 * (1 + off[:, None])
        tones = np.sin(2 * np.pi * hz * rise_s * u).sum(0)
        add(out, s, nominal_scale(db - 5.5) * u * np.exp(1 - u) * tones)
    return out


def narrow_tongs():
    # (time [s], length [s], level [dB])
    spells = [
        (7.845, 0.069, -65),
        (7.912, 0.013, -59),
        (8.001, 0.0036, -48),
    ]
    # (frequency [Hz], level [dB], t60 [s])
    modes = [(6470, -5, 0.043), (7660, -10, 0.13), (8950, -9, 0.045), (9200, -16, 0.05),
             (10300, -16, 0.039)]
    return chattering(spells, modes)


def scene():
    hammer = motor() + ram() + take_up() + crack() + thud() + clatter()
    small = ticks() + wide_tongs() + squeal() + rub() + scale() + spring() + narrow_tongs()
    return (hammer + small)[None]


def band_limit(x):
    return signal.sosfilt(signal.butter(12, 16530, fs=SR, output="sos"), x)


def record(dry):
    taps = signal.firwin(301, 15350, window=("kaiser", 6), fs=SR)[None]
    x = signal.oaconvolve(dry, taps, "same") + nominal_scale(-44) * dry
    knee, room = .7, .25
    over = np.maximum(abs(x) - knee, 0)
    x = np.sign(x) * (np.minimum(abs(x), knee) + room * np.tanh(over / room))
    inside = signal.oaconvolve(x, taps, "same")
    spill = signal.lfilter(*signal.butter(6, 16300, fs=SR), x - inside)
    return band_limit(inside + nominal_scale(-5) * spill)


dry = scene()
out = record(dry)
transcribe(out)
```